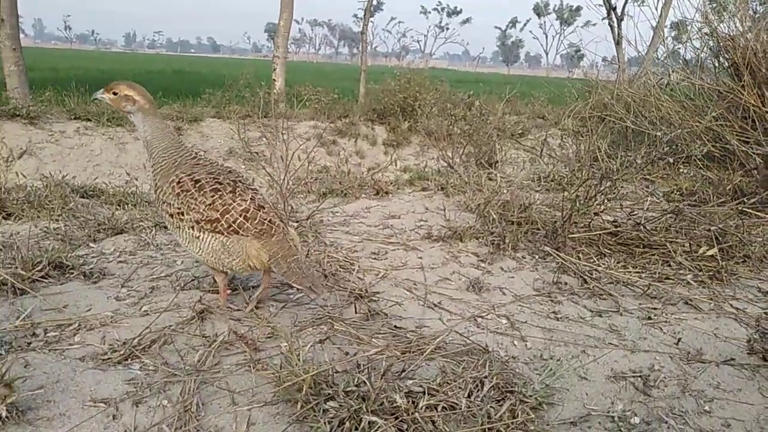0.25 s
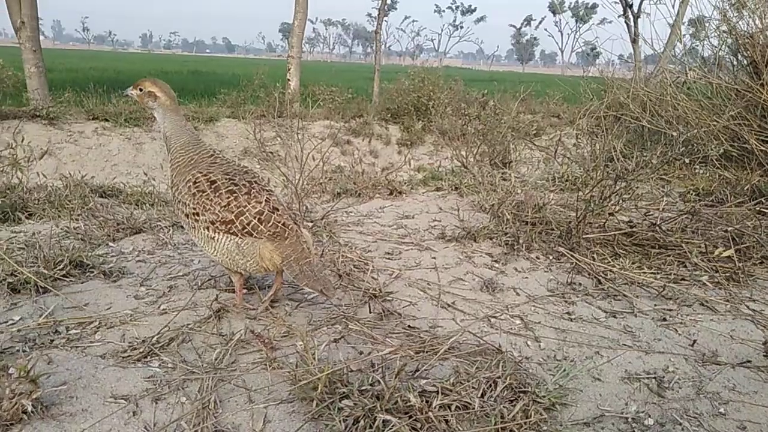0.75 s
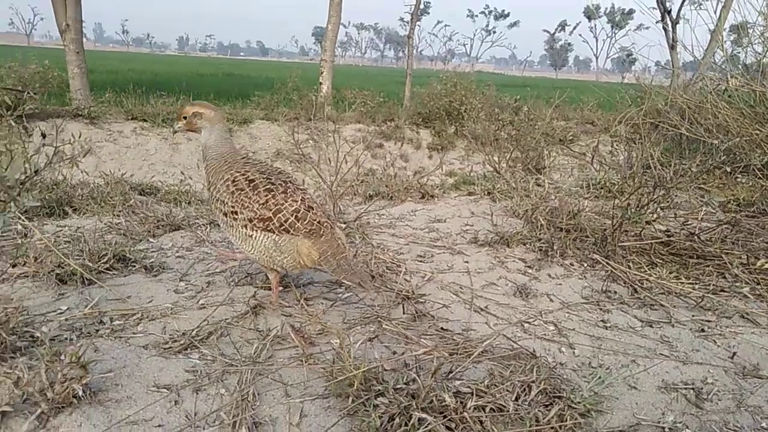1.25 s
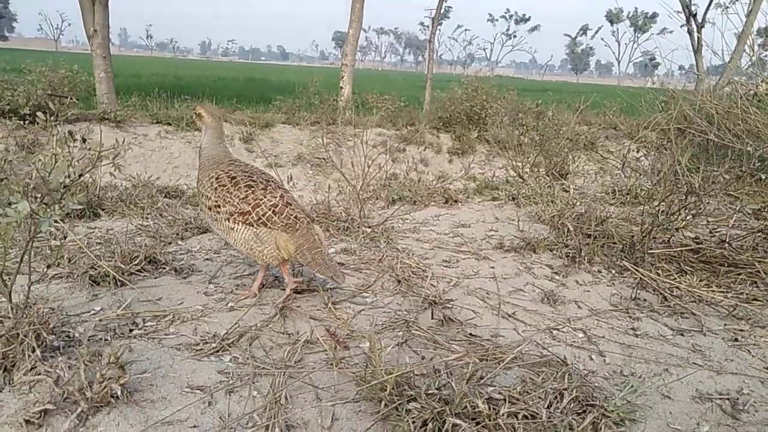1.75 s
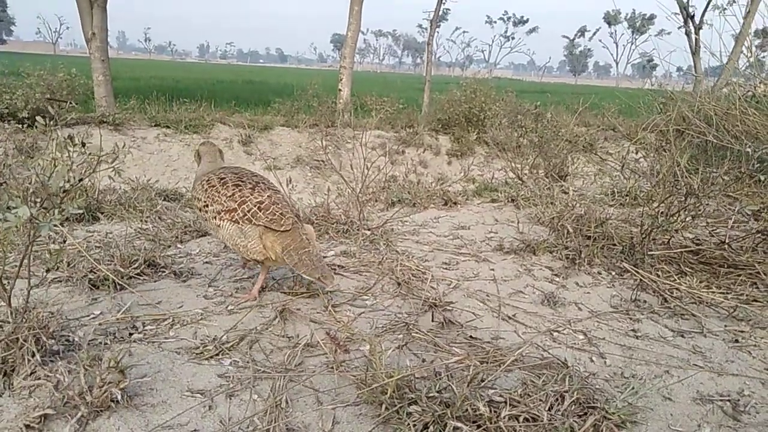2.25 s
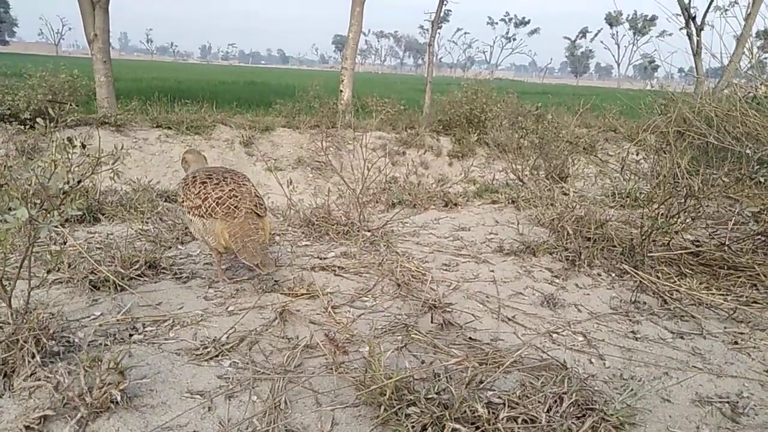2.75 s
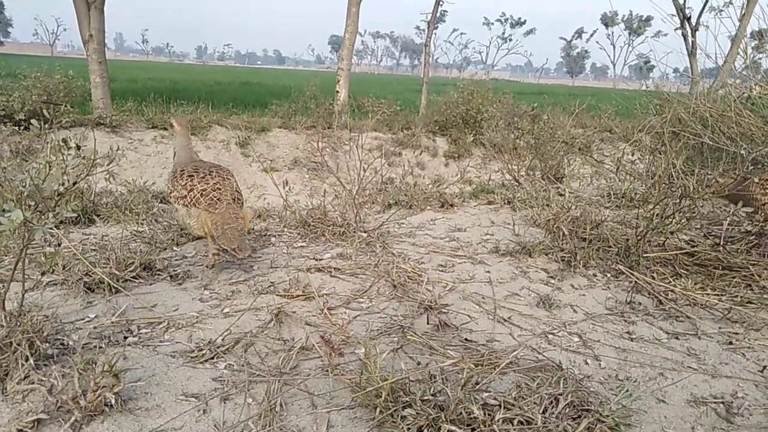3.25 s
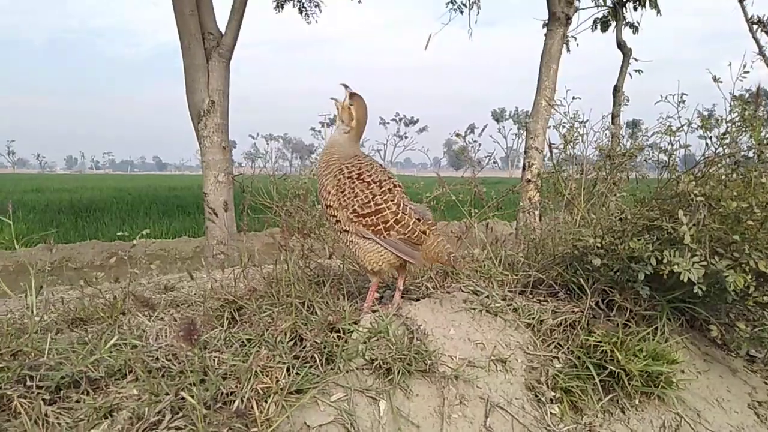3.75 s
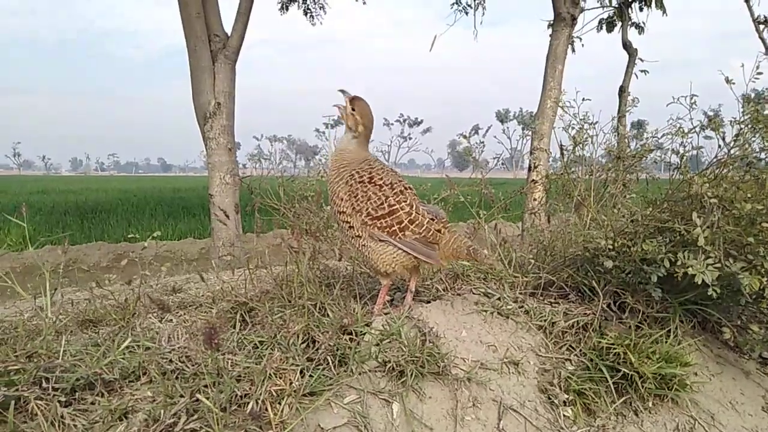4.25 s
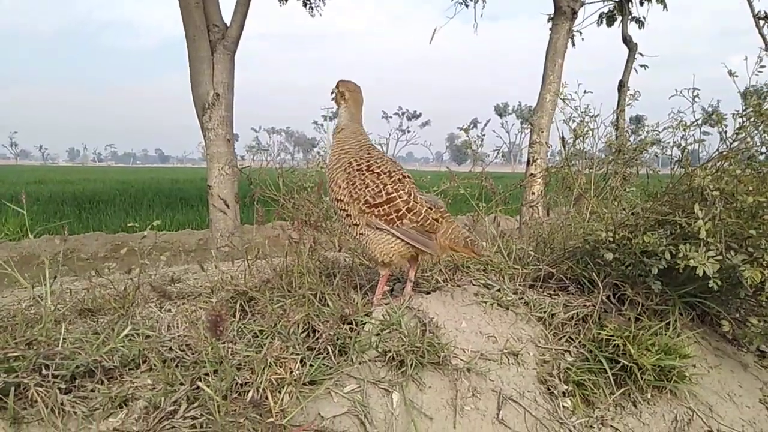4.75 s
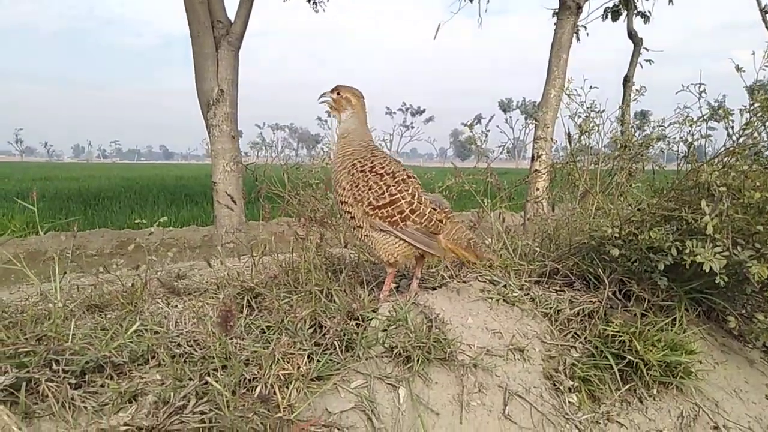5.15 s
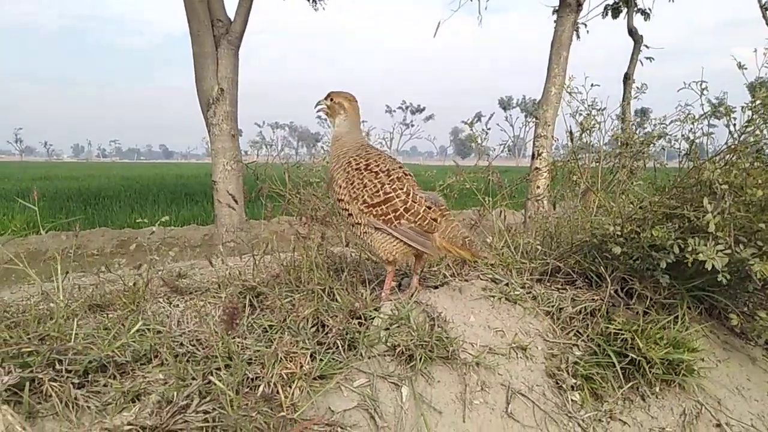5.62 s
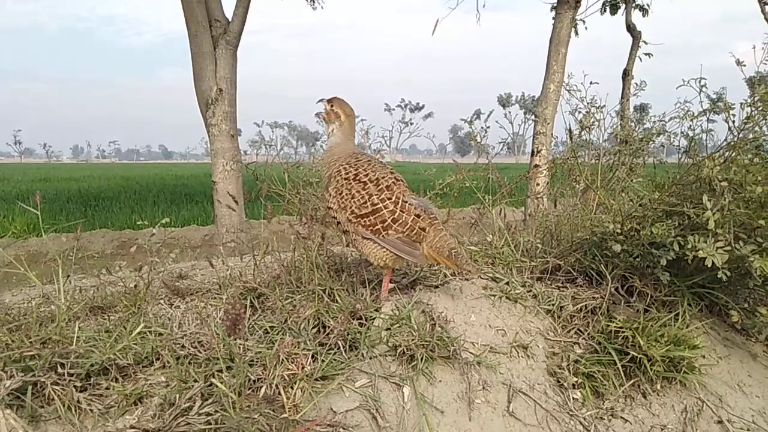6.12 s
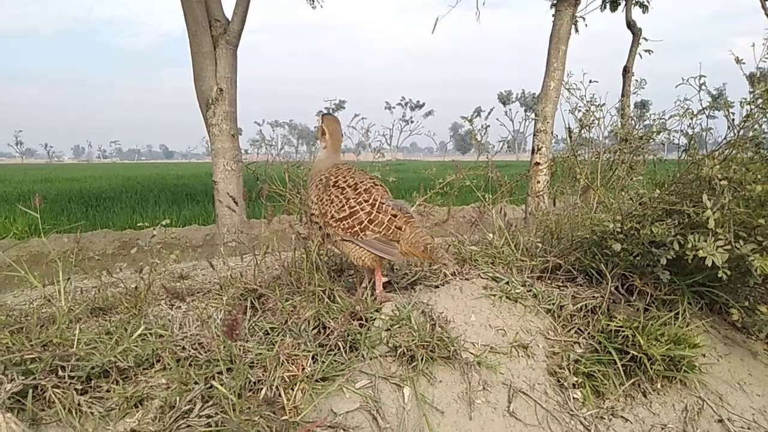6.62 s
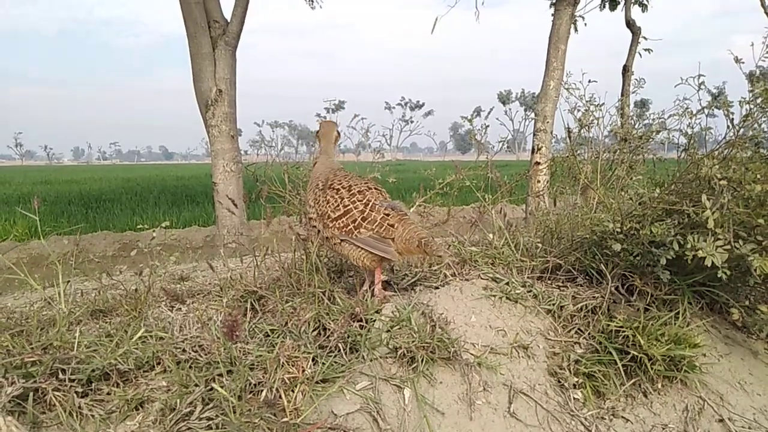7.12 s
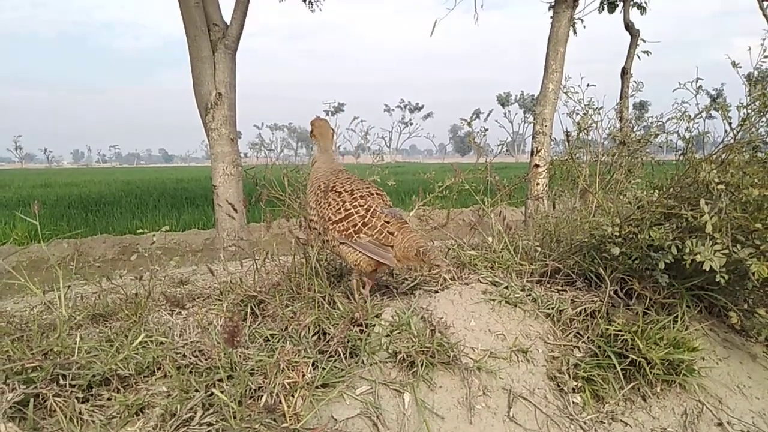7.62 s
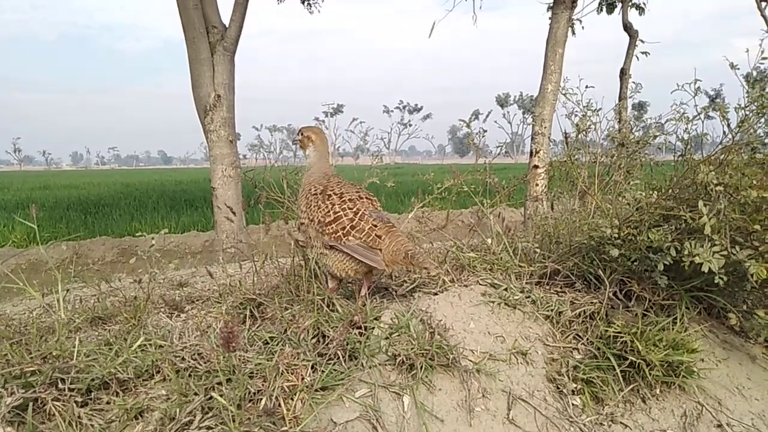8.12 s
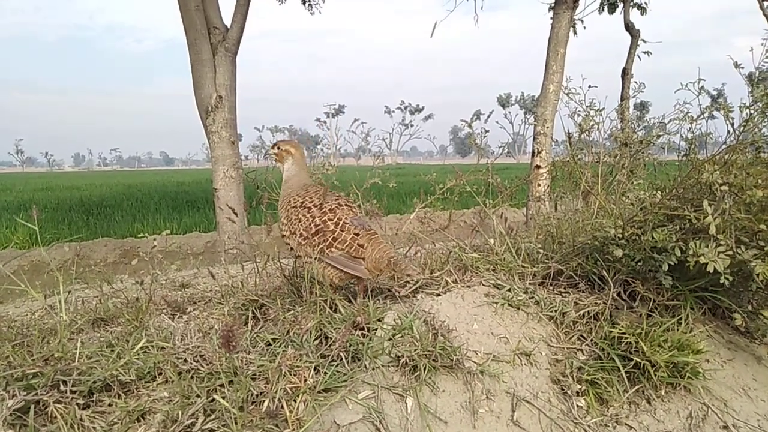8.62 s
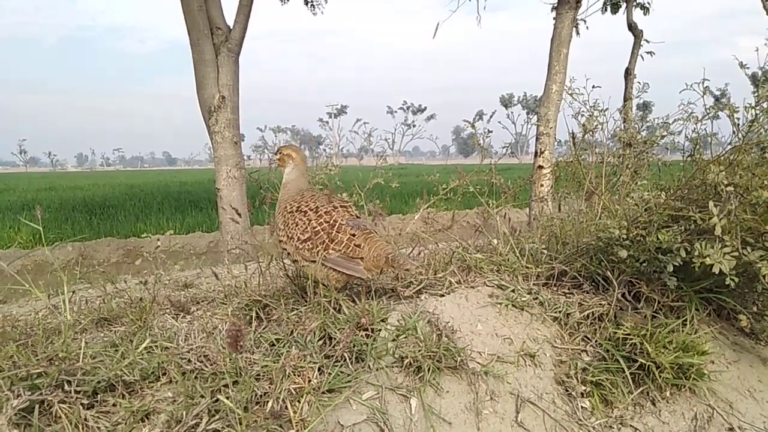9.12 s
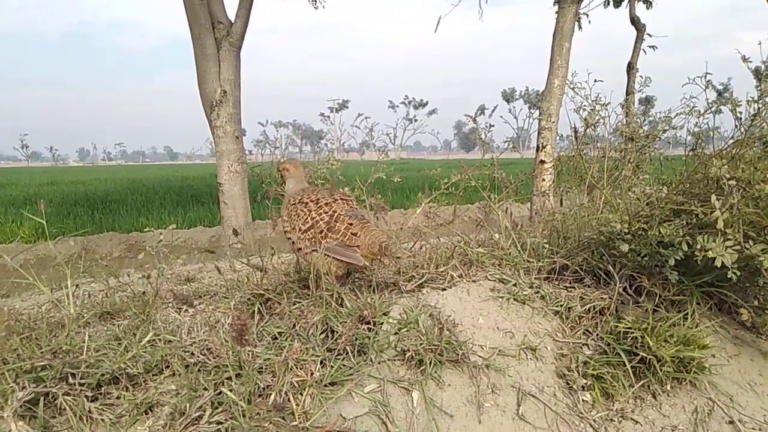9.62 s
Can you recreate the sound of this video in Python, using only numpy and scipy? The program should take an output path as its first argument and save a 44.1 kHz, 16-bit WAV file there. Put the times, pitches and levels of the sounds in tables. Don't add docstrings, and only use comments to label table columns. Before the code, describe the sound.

Quiet open farmland with a low, far traffic hum and soft air hiss. A ground bird gives three short nasal barks about half a second apart, the last loudest, then dry twigs rustle faintly. An abrupt cut brings a closer duet: one bird clucks in quick twos and threes while another answers with a steady high whistle and a leaping falling note, cycling steadily. The calls stop, leaving hum and small rustles. Phone microphone, mono, faint outdoor echoes.

```python
import sys
import numpy as np
from scipy import signal
from scipy.fft import rfft, irfft, next_fast_len
from scipy.io import wavfile
from scipy.ndimage import map_coordinates

SR = 44100
rng = np.random.default_rng(int(sys.argv[2]) if len(sys.argv) > 2 else 0)


def pcm_store(signal):
    levels = np.round(np.clip(np.atleast_2d(signal), -1, 1) * 32767)
    wavfile.write(sys.argv[1], SR, levels.astype(np.int16).T)


def boost_factor(decibels):
    exponent = np.asarray(decibels, float) / 20
    return 10 ** exponent


N = 435266
CUT_S = 3.578


def unit(x):
    return x / np.sqrt(np.mean(x ** 2) + 1e-20)


def along(points, hz):
    f, v = np.transpose(points)
    return np.interp(np.log(hz + 1), np.log(f + 1), v)


def wobble(rate, size):
    knots = rng.standard_normal(int(size * rate / SR) + 4)
    return map_coordinates(knots, [np.arange(size) * rate / SR])


def hiss(spectrum, size):
    m = next_fast_len(size + 8192)
    colour = boost_factor(along(spectrum, np.fft.rfftfreq(m, 1 / SR)))
    return unit(irfft(rfft(rng.standard_normal(m)) * colour, m)[:size])


def add(track, s, x):
    track[round(s * SR):][:len(x)] += x


def syrinx(track, rows, tract, air, breath_db, order=1, width=.3, dull_db=0, even_db=-99, spread=.48):
    s, *cols = np.transpose(rows)
    s = np.maximum.accumulate(s)
    t = np.arange(s[0], s[-1], 1 / SR)
    hz, db, throat_hz, lift_db, rough, under_db = (np.interp(t, s, c) for c in cols)
    rough = np.clip(rough, 0, 1)
    k = np.arange(1, int(16500 * order / hz.min()) + 1)[:, None]

    drift = (.0015 + .05 * rough) * wobble(90, len(t))
    cycle = np.cumsum(hz / order * (1 + drift)) / SR
    cycle = cycle + .07 * rough * wobble(600, len(t)) / order

    f = k * hz[::16] / order
    throat_hz, lift_db, under_db, coarse = throat_hz[::16], lift_db[::16], under_db[::16], rough[::16]
    lift = lift_db / (1 + ((f - throat_hz) / (width * throat_hz)) ** 2)
    lift = lift - np.maximum(lift_db - 4, 0) * (.3 * (f > 4500) + .5 * (f > 9000))
    lift = lift - dull_db * np.log2(2700 / throat_hz) * (f > 1.6 * throat_hz) - 16 * coarse * (f > 9500)
    under = k % order > 0
    colour = np.maximum(along(tract, f), np.where(under, even_db - 60 * coarse, -99))
    size = boost_factor(colour + lift + under_db * under) * (f < 16000)

    knots = rng.standard_normal((len(k), len(t) // 200 + 2))
    i, part = np.divmod(np.arange(len(t))[::16], 200)
    patches = knots[:, i] + (knots[:, i + 1] - knots[:, i]) * part / 200
    size = size * boost_factor((1 + 9 * coarse + 3 * under) * patches * (k > order))
    size = size / np.sqrt(np.sum(size ** 2, axis=0) / 2)
    size = np.repeat(size, 16, axis=1)[:, :len(t)]

    turn = np.float32(k) * np.float32(2 * np.pi * (cycle % 1))
    start = np.float32(2 * np.pi * spread * rng.random(k.shape))
    tone = np.sum(size * np.cos(turn + start), axis=0)
    shimmer = boost_factor(8 * rough * np.tanh(wobble(300, len(t))) + .6 * wobble(90, len(t)))
    puffs = 1 + 0.66 * np.cos(2 * np.pi * cycle)
    breath = boost_factor(breath_db) * (rough + 0.011) * hiss(air, len(t)) * puffs
    edge = np.minimum(1, np.minimum(t - s[0], s[-1] - t) / 0.0022)
    add(track, s[0], boost_factor(db) * edge * (tone * shimmer + breath))


# (start [s], rasp length [s], tone length [s], tone level [dB], tone pitch [Hz])
CLUCKS = [(3.652, .015, .023, -29, 1300), (4.005, .023, .026, -15, 1400), (4.115, .018, .034, -15, 1380),
          (4.578, .02, .025, -16, 1480), (4.682, .023, .035, -16.5, 1430), (5.146, .019, .024, -15, 1500),
          (5.242, .024, .037, -15.5, 1440), (5.707, .024, .023, -17.5, 1470), (5.808, .024, .03, -18, 1400),
          (5.925, .015, .025, -28, 1350), (6.32, .017, .031, -15, 1460), (6.424, .026, .022, -17, 1430),
          (6.897, .022, .024, -18, 1440), (7.004, .021, .033, -23, 1550), (7.105, .015, .02, -42, 1350),
          (7.498, .038, .017, -23, 1360), (7.603, .017, .032, -22, 1400), (7.705, .02, .023, -30, 1350),
          (8.111, .023, .021, -18, 1390), (8.216, .014, .028, -22, 1380), (8.315, .02, .023, -30, 1350),
          (8.732, .016, .028, -22, 1480), (8.838, .014, .027, -30, 1450), (8.936, .014, .022, -33, 1420)]
# (beak opening as overtone level [dB], swell along the tone [dB])
DELIVERY = [(-8, 1), (-2.5, 3.5), (-5, 4), (1, -5), (-1.5, 1.5), (3, -1), (-0.5, 0.5), (0.5, -5),
            (-1.5, -0.5), (-8.5, -2.5), (3.5, -0.5), (-4.5, -2), (-3.5, -1.5), (-4.5, 0.5), (-8, 1.5),
            (-7.5, 0.5), (-11.5, 0.5), (-8, 0), (-9, -1.5), (-10.5, 1), (-8.5, 0), (-7.5, 2), (-13, 1),
            (-13.5, -1)]
PURITY = [0, 1, 1, 1, 1, 1, 1, .65, .65, 0, 1, .9, 1, .05, 0, .25, .4, 0, 1, .4, .1, .2, 0, 0]
# (top of the rasp [Hz], rasp against the tone [dB], effort [dB])
CLIMBS = [(1300, 0, 0), (1650, -6, 0), (1600, -6, 0), (1720, -6, 0), (1580, -6, 0), (1750, -6, 0),
          (1720, -6, 0), (1800, -4, 0), (1700, -4, 0), (1250, 0, 0), (1650, -6, 0), (1680, -5, 0),
          (1720, -4, 0), (1560, 0, 0), (1350, 0, 0), (1720, 0, 0), (1430, -1, 0), (1350, 0, 0),
          (1580, -4, 0), (1400, -1, 0), (1350, 0, 0), (1480, 0, 0), (1450, 0, 0), (1420, 0, 0)]
# (frequency [Hz], level [dB])
CLUCKER = [(330, -50), (480, -13), (800, -18.5), (1150, 0), (1820, -1.5), (2100, -17), (3100, -5),
           (4500, -18), (5900, -8), (7500, -17), (9000, -13), (10500, -32), (14500, -27), (16500, -46)]
# (frequency [Hz], density [dB per Hz])
RASP = [(400, -35.5), (900, -7.5), (1500, 5), (2100, -9), (3200, -18.5), (6000, -33), (8500, -32),
        (11000, -29), (16500, -50)]


def clucker():
    track = np.zeros(N + SR)
    first_db, mid_db, last_db = 24, 20, 17
    rasp_throat = 1420
    for cluck, (open_db, swell_db), pure, climb in zip(CLUCKS, DELIVERY, PURITY, CLIMBS):
        a, rasp, tone, db, hz = cluck
        top_hz, rasp_db, effort_db = climb
        b, c = a + rasp, a + rasp + tone
        db = db + effort_db
        rasp_db = db + rasp_db
        under_db, rough = -34 * pure, .36 - .32 * pure
        lift_db = 11 + 10 * pure
        throat_hz = rasp_throat + pure * (hz - rasp_throat)
        tract = [(f, g + open_db * (f > 2500)) for f, g in CLUCKER]
        air = [(f, g + open_db * (f > 2500)) for f, g in RASP]
        arch_s = .3 * tone * (pure < .5) * (top_hz < 1.1 * hz)
        climbing = [
            (a - .004 - .004 * pure, (.62 - .12 * pure) * top_hz, rasp_db - 13 - 7 * pure,
             1250, first_db, .3, 0),
            (a + .004, .74 * top_hz, rasp_db - 5, 1350, mid_db, .3, 0),
            (a + min(.016, .75 * rasp), .95 * top_hz, rasp_db, rasp_throat, last_db, .42, 0),
            (b + .001, top_hz, rasp_db - 2 * pure, rasp_throat, last_db, .42, -1)]
        falling = [
            (b + .002 + arch_s, 1.06 * hz, db - swell_db / 2, 1.08 * throat_hz, lift_db, rough, under_db),
            (c - .002, (.9 + .045 * pure) * hz, db - 4.5 + 2.1 * pure + swell_db / 2,
             .96 * throat_hz, lift_db + 5, rough, under_db),
            (c + .002, .86 * hz, db - 9 - 7 * pure, hz, 20, .3, -6),
            (c + .02, .9 * hz, db - 34, hz, 22, .5, -3)]
        syrinx(track, climbing + falling, tract, air, breath_db=-3, order=3, width=.3)

    cut = [(CUT_S, 1203, -15.5, 1200, 23, .08, -20),
           (3.59, 1148.5, -27, 1150, 32.5, 0.3, -26),
           (3.605, 1119, -42.5, 1150, 17.5, 0.1, -9)]
    syrinx(track, cut, CLUCKER, RASP, breath_db=-5.5, order=3)
    step = boost_factor(-32.5) * np.pad(np.hanning(7), (0, 17)) + boost_factor(-20) * np.hanning(24)
    add(track, CUT_S, step)
    return track[:N]


# (frequency [Hz], density [dB per Hz])
WHEEZE = [(500, -25.5), (1200, 1), (3000, 4.5), (5000, -14.5), (8000, 0.5), (10500, -12), (13500, -8),
          (15500, -9), (16500, -25)]


def sing(track, rows, tract, air=WHEEZE, **more):
    tuned = [(s, hz, db, hz, *rest) for s, hz, db, *rest in rows]
    syrinx(track, tuned, tract, air, breath_db=-7, order=2, **more)


# (start [s], length [s], pitch [Hz], level [dB], undertone [dB])
WHISTLES = [(3.675, .074, 2563, -24.2, -29), (4.215, .076, 2563, -22.6, -29),
            (4.777, .076, 2562, -22.2, -30), (5.341, .078, 2553, -21, -31), (5.929, .078, 2554, -20.5, -29),
            (6.527, .077, 2550, -20.2, -28), (7.108, .082, 2556, -19.5, -41), (7.715, .081, 2546, -20, -31),
            (8.325, .08, 2547, -21, -38)]
KICKS_DB = [8.5, 5.5, 5.5, -6.5, 4.5, 7, -5.5, -7, -6]
# (frequency [Hz], level [dB])
WHISTLER = [(500, -22), (1000, -6), (2500, -4), (3900, -3), (4500, -9), (5200, -3), (6200, -10),
            (7700, -31), (10200, -33), (12800, -16), (15300, -12), (16500, -34)]


def long_whistles(track):
    for (b, length, hz, db, under_db), kick_db in zip(WHISTLES, KICKS_DB):
        a, c = b - .043, b + length
        lead_db = db - 9
        arch = [
            (a - .002, 1050, lead_db - 12, -8, .35, -14), (a + .006, 1350, lead_db, -8, .3, -16),
            (a + .007, 1880, lead_db, -8, .2, -22), (a + .012, 1970, lead_db + 2, -8, .15, -22),
            (a + .018, 1880, lead_db, -8, .25, -18), (a + .02, 1550, lead_db, -6, .3, -14),
            (a + .025, 1350, lead_db - 1, -4, .4, -12), (a + .026, 960, lead_db - 2, 10, .4, -12),
            (b - .006, 1100, lead_db - 2, 13, .35, -14), (b - .003, 1150, lead_db - 10, 12, .5, -12)]
        sing(track, arch, LEAPER)
        grace = [
            (b - .01, 2060, db - 13.5, 10, .4, -14), (b - .004, 2120, db + kick_db - 3.5, 16, .2, -20),
            (b + .001, 2150, db + kick_db, 16, .2, -20)]
        whistle = [
            (b + .0018, .998 * hz, db, 3, .1, under_db + 4.5), (b + 0.037, hz, db, 3, .04, under_db),
            (c, 1.004 * hz, db, 3, .03, under_db)]
        release = [
            (c + .001, 2000, db - 8, 3, .4, -14), (c + .005, 1800, db - 13, 3, .5, -12),
            (c + .006, 950, db - 14, 3, .6, -8), (c + .022, 800, db - 30, 3, .9, -8)]
        sing(track, grace + whistle + release, WHISTLER, even_db=-5)


# (peep start [s], lead-in [s], slide length [s], peep pitch [Hz], slide start pitch [Hz])
LEAPS = [(3.813, .044, .026, 2580, 1916), (4.373, .051, .031, 2594, 1942), (4.933, .051, .037, 2624, 1946),
         (5.495, .05, .045, 2631, 1945), (6.107, .055, .046, 2603, 1929), (6.682, .045, .048, 2618, 1930),
         (7.285, .052, .045, 2613, 1923), (7.909, .055, .03, 2596, 1876), (8.53, .057, .024, 2602, 1882)]
# (start level [dB], time to full strength [s], end level [dB], throat lift [dB])
SWELLS = [(0.5, 0.0036, -6, 18.5), (-1, .005, -5, 20), (-3, .006, -7, 21), (-0.5, .006, -3.5, 17.5),
          (-3.5, 0.014, -3.5, 13.5), (-6.5, .018, -7, 16), (-7.5, .018, -7, 16), (-8, 0.021, -3.5, 16),
          (-3, 0.017, -2.5, 17)]
# (frequency [Hz], level [dB])
LEAPER = [(500, -21), (1000, -7.5), (2000, 2), (2600, -2.5), (3100, 6), (3900, -3.5), (4500, -11),
          (5200, 1.5), (5900, -4.5), (7800, -16.5), (10000, -23), (13000, -26), (15500, -22), (16500, -39)]
# (frequency [Hz], density [dB per Hz])
PANT = [(500, -25.5), (1200, 0), (3000, 5), (5000, -12), (8000, -2), (10500, -18.5), (13500, -15),
        (15500, -14), (16500, -28)]


def leaping_notes(track):
    push, throb = np.zeros((2, N + SR))
    lead_db, db, dip_db, slide_db = -21.5, -14, -32.5, -14.5
    fall = 6500
    for (b, lead, slide, hz, from_hz), (start_db, full_s, end_db, lift_db) in zip(LEAPS, SWELLS):
        a, c = b - lead, b + .021
        d = c + .029
        e = d + slide
        to_hz = from_hz - fall * slide
        add(throb, d, .17 * np.sin(2 * np.pi * 150 * np.arange(0, slide, 1 / SR)))
        top = b - .038
        lead_in = [
            (min(a, top - .012) - .001, 950, lead_db - 11, 0, .4, -12),
            (top - .01, 1100, lead_db - 1, 0, .35, -14), (top - .005, 1350, lead_db, 0, .3, -14),
            (top - .004, 1960, lead_db, -3, .15, -24), (top + .004, 1970, lead_db, -3, .15, -24),
            (top + .008, 1600, lead_db - 1, 0, .35, -14), (top + .009, 1000, lead_db - 1, 9, .4, -12),
            (top + .02, 1010, lead_db, 14, .42, -11), (b - .002, 1070, lead_db + 1, 14, .42, -11)]
        peep = [
            (b - .001, 2050, db - 7, 8, .4, -12), (b + .001, 2150, db - 4, 8, .3, -14),
            (b + .002, hz, db, 7, .1, -28), (c - .001, .99 * hz, db - 3, 7, .1, -28)]
        dip = [
            (c, 2050, db - 7, 12, .3, -14), (c + .005, 1750, db - 11, 8, .4, -12),
            (c + .006, 950, dip_db + 7, 8, .45, -12), (c + .016, 900, dip_db, 12, .45, -12),
            (d - .003, 950, dip_db + 2, 12, .45, -12), (d - .001, 1500, dip_db + 9, 10, .4, -12)]
        sliding = [
            (d, 1.03 * from_hz, slide_db + start_db, lift_db, .15, -30),
            (d + full_s, from_hz - fall * full_s - 20, slide_db, lift_db + 3, .05, -36),
            (e - .001, to_hz, slide_db + end_db, 25, .08, -36)]
        release = [
            (e + .001, .97 * to_hz, slide_db - 15, 22, .4, -12),
            (e + .012, 1600, slide_db - 20, 20, .6, -8), (e + .022, 1300, slide_db - 36, 16, .8, -6)]
        sing(track, lead_in + peep + dip + sliding + release, LEAPER, PANT)
        puff = np.sin(np.linspace(0, 2 * np.pi, 1500)) * np.hanning(1500)
        add(push, b - .006, boost_factor(db - 27) * puff)
        add(push, b - .001, boost_factor(db - 36.0) * np.sin(np.linspace(0, 2 * np.pi, 140)))
    return throb, push


def whistler():
    track = np.zeros(N + SR)
    long_whistles(track)
    throb, push = leaping_notes(track)
    small = signal.butter(4, 830, "high", fs=SR, output="sos")
    return (signal.sosfilt(small, track * (1 + throb)) + push)[:N]


# (time [s], pitch [Hz], level [dB], throat resonance [Hz], roughness [0-1])
BARKS = [
    [(.9285, 438.4, -25, 2600, .15), (.941, 499.6, -17.5, 2500, .08), (.951, 545, -15.5, 2550, .3),
     (.962, 553.3, -16, 2200, .06), (.976, 629.4, -18.5, 1900, .06), (.992, 616, -19, 1800, .3),
     (1.003, 547.5, -24.5, 1600, 0), (1.019, 385, -34.5, 1200, .15), (1.029, 337, -51, 1050, .2)],
    [(1.507, 480, -29, 2450, .12), (1.529, 601, -15, 2400, .06), (1.54, 704, -19, 2200, .15),
     (1.549, 692, -17, 2050, .5), (1.558, 676, -18.5, 2000, .12), (1.569, 615, -19, 1800, .08),
     (1.583, 474, -25.5, 1400, 0.2), (1.595, 378, -41.5, 1150, .2), (1.604, 329, -57, 1000, 0.3)],
    [(2.121, 505, -24, 2500, .2), (2.134, 622, -16.5, 2350, .25), (2.148, 694, -16, 2100, 0.2),
     (2.159, 715.3, -13.5, 2120, .1), (2.164, 621.3, -22.5, 1850, 0.6), (2.172, 685, -20, 1900, 0.2),
     (2.19, 560, -25.5, 1600, 0.1), (2.206, 398.3, -34.5, 1200, .15), (2.218, 315, -54, 1000, 0.1)],
]
# (time into the bark [s], throat lift [dB])
THROAT_LIFT = [
    (0, 4),
    (.014, 22.5),
    (.05, 20.5),
    (.089, 14.5),
]
# (frequency [Hz], level [dB])
BARKER = [(250, -19), (400, -18), (650, -26), (1400, -18), (2500, -14.5), (3500, -28), (4500, -14.5),
          (5700, -27), (7000, -11.5), (9000, -29), (11000, -29.5), (14000, -32), (16500, -48)]


def barker():
    track = np.zeros(N + SR)
    for bark in BARKS:
        rows = []
        for s, hz, db, throat_hz, rough in bark:
            lift_db = np.interp(s - bark[0][0], *np.transpose(THROAT_LIFT))
            under_db = 40 * rough - 32
            rows.append((s, hz, db, throat_hz, lift_db, rough + .08, under_db))
        syrinx(track, rows, BARKER, BARKER[2:], breath_db=-8.5, order=2, spread=.35, width=.16, dull_db=10.5)
    return track[:N]


# (start [s], length [s], from [Hz], to
# [Hz], level [dB])
PEEPS = [(0.892, 0.034, 527, 575, -53), (2.355, 0.065, 659, 634, -70), (2.73, .065, 1200, 1150, -72),
         (2.793, 0.048, 994, 600, -59.5), (2.837, .045, 600, 562, -57.5), (2.877, .025, 567, 800, -58.5),
         (0.353, 0.71, 1334, 1296, -76.5), (.4, .25, 2910, 2850, -78), (2.745, 0.041, 3600, 3480, -75),
         (2.381, 0.087, 2740, 2660, -78), (6.247, 0.04, 8800, 8750, -61), (7.455, .024, 3550, 3700, -66),
         (7.474, .02, 3680, 2700, -66), (9.08, .78, 250, 254, -73), (9.064, 0.0087, 1520, 1230, -49)]


def peeps():
    track = np.zeros(N + SR)
    for s, length, from_hz, to_hz, db in PEEPS:
        size = round(length * SR)
        turn = 2 * np.pi * np.cumsum(np.linspace(from_hz, to_hz, size)) / SR
        tone = np.sin(turn) + .12 * np.sin(2 * turn) + .8 * np.sin(3 * turn) * (from_hz < 550)
        swell = boost_factor(db + 2.2 * wobble(36, size)) * signal.windows.tukey(size, .3)
        add(track, s, swell * tone)
    return track[:N]


# (time [s], peak level [dB], low part [dB])
RUSTLES = [(0.776, -56.5, -4.5), (1.1932, -65, -16), (1.4366, -55.5, -24.5), (2.5275, -61, -17.5),
           (2.6004, -58.5, -16.5), (2.6509, -60, -10.5), (3.1073, -52.5, -2), (3.4194, -67.5, 6.5),
           (3.4711, -57.5, -2.5), (3.539, -81, 22.5), (6.309, -62, -25), (9.066, -61.5, 3),
           (9.5696, -60, -12.5), (9.6194, -62.5, 5), (9.6794, -62, 1.5), (9.7502, -62.5, -16)]


def rustles():
    track, t = np.zeros(N + SR), np.arange(1200) / SR
    crisp = [(3500, -69), (6500, -5), (9000, 3), (14000, 14.5), (16500, -14.5)]
    dull = [(700, -19), (1300, 6), (3000, -3.0), (4500, -24.5)]
    for s, db, low_db in RUSTLES:
        grains = boost_factor(5.7 * wobble(900, len(t)) - 60 * t / 0.21) * np.minimum(1, t / 0.0018)
        crackle = hiss(crisp, len(t)) + boost_factor(low_db) * hiss(dull, len(t))
        add(track, s, boost_factor(db - 10.5) * grains * crackle)
    return track[:N]


# (time [s], hum level [dB])
FIELD = [(0.0, -54), (0.77, -53), (0.9, -57), (2.47, -57.5), (2.78, -55), (3.41, -55), (5.17, -56.5),
         (5.91, -55), (6.95, -57), (7.09, -56), (8.8, -55), (9.02, -54), (9.87, -52)]
# (frequency [Hz], density [dB per Hz])
HUM = [(12, -42.5), (20, -2), (45, -.5), (75, 4), (135, -5.5), (171, -4), (221, -20.5), (258, -26.5),
       (304, -36), (330, -29), (430, -46), (730, -120)]
HUM_NEAR = [(11, -34.5), (18, -3), (30, -3), (43, 1.5), (113, -6.5), (169, -7), (259, -22), (330, -35),
            (430, -65.5), (730, -120)]
# (frequency [Hz], density [dB per Hz])
AIR = [(140, -29), (230, -12), (438, -13.5), (672, -17), (762, -18), (928, -21.5), (1700, -17.5),
       (4020, -30), (11500, -33), (15400, -30), (16500, -32)]
AIR_NEAR = [(200, -29.5), (280, -3), (420, -3), (700, -0.5), (1000, -7), (1600, -4.5), (2500, -8.5),
            (4200, -20), (15000, -16.5)]


def field():
    t = np.arange(N) / SR
    first = t < CUT_S
    traffic_db = np.interp(t, *np.transpose(FIELD))
    hum_db = traffic_db + .6 * wobble(2, N) + 1.2 * wobble(9, N)
    hum = boost_factor(hum_db) * np.where(first, hiss(HUM, N), hiss(HUM_NEAR, N))
    air_db = traffic_db + np.where(first, -13.5, -15.5) + 0.73 * wobble(3, N) + .6 * wobble(15, N)
    return hum + boost_factor(air_db) * np.where(first, hiss(AIR, N), hiss(AIR_NEAR, N))


def echoes(x, decay):
    out, step = np.zeros(N + 2 * SR), int(.3 * SR)
    for i in range(0, N, step):
        hz, t, z = signal.stft(rng.standard_normal(SR // 2), SR, nperseg=256)
        dying = boost_factor(-60 * t / along(decay, hz)[:, None])
        tail = signal.istft(z * dying, SR, nperseg=256)[1]
        tail = tail / np.linalg.norm(tail)
        add(out, i / SR + 0.0042, signal.fftconvolve(x[i:i + step], tail))
    return out[:N]


# (frequency [Hz], time to fall 60 dB [s])
BUSHES = [(500, .1), (2000, .16), (5200, .3), (9000, .2), (15000, .25)]
# (frequency [Hz], time to fall 60 dB [s])
TREES = [(500, .5), (2000, 0.32), (6000, 0.36), (15000, 0.34)]


def scene():
    barks, duet = barker(), clucker() + whistler()
    near = echoes(boost_factor(-33) * barks + boost_factor(-19.5) * duet, BUSHES)
    far = echoes(boost_factor(-51.5) * barks + boost_factor(-36.0) * duet, TREES)
    return (barks + duet + near + far + peeps() + rustles() + field())[None]


def band_limit(x):
    return signal.sosfilt(signal.butter(12, 16830, fs=SR, output="sos"), x)


def record(dry):
    m = next_fast_len(N)
    kept = np.fft.rfftfreq(m, 1 / SR) < 16000
    dry = irfft(rfft(dry, m) * kept, m)[:, :N]
    top, knee = .4, 6
    dry = dry / (1 + np.abs(dry / top) ** knee) ** (1 / knee)
    return band_limit(dry)


dry = scene()
out = record(dry)
pcm_store(out)
```